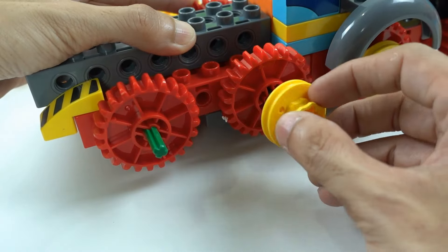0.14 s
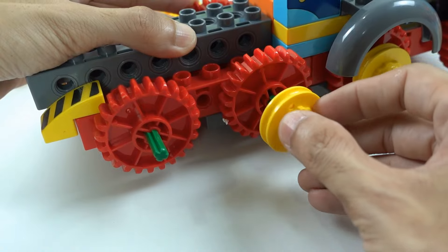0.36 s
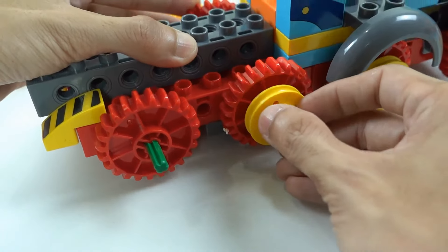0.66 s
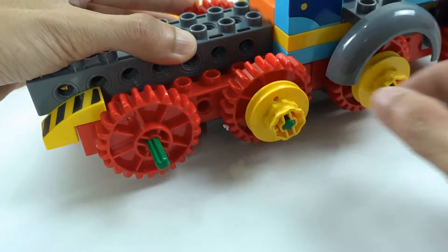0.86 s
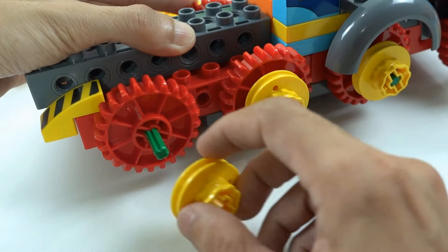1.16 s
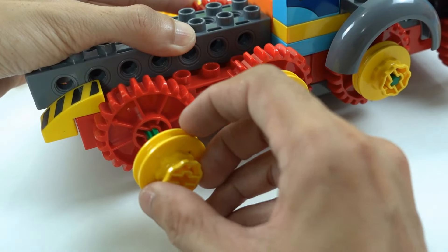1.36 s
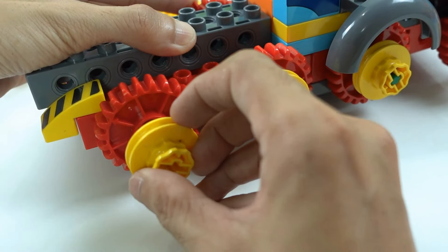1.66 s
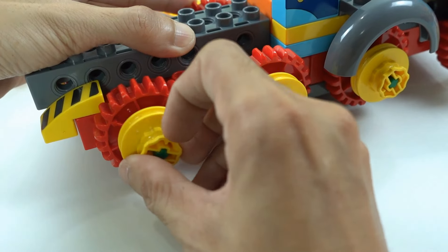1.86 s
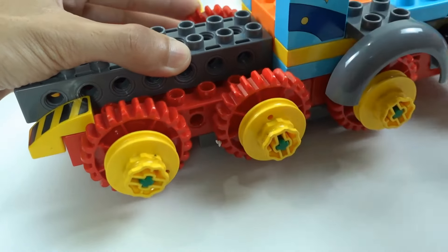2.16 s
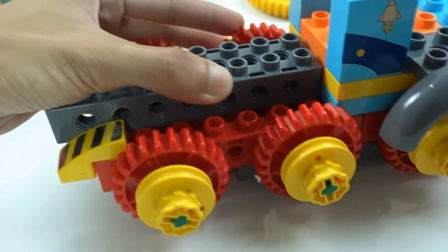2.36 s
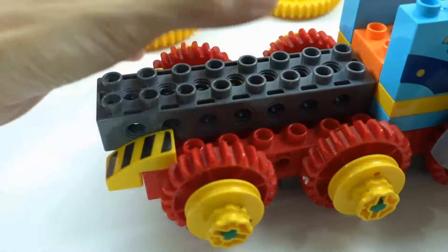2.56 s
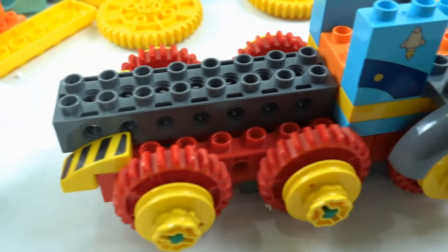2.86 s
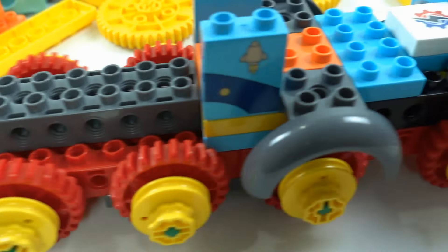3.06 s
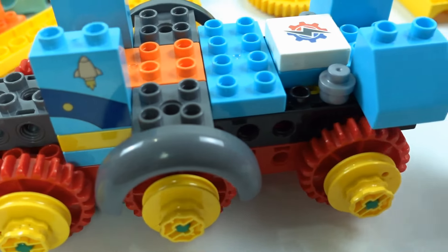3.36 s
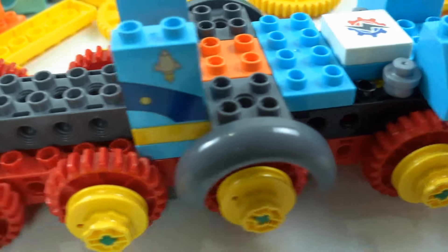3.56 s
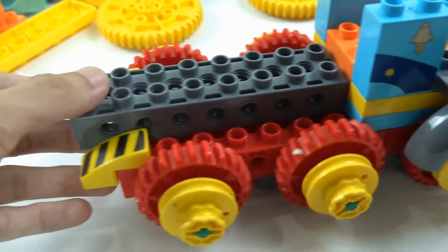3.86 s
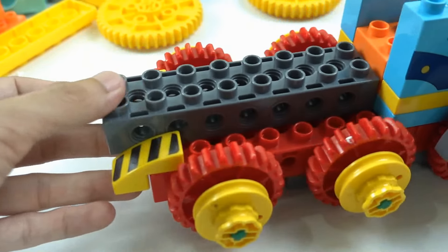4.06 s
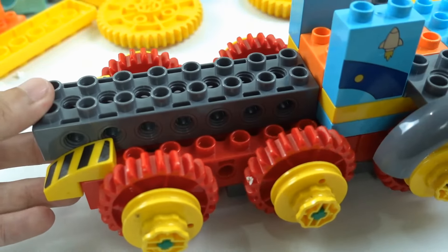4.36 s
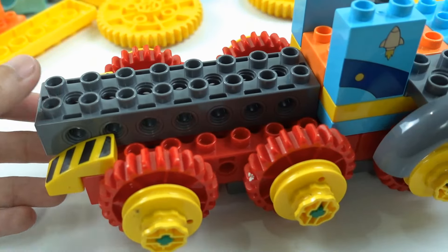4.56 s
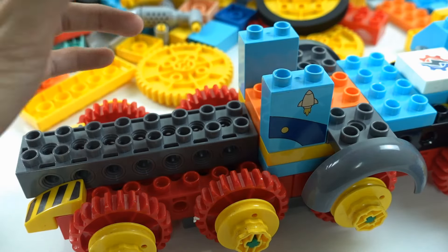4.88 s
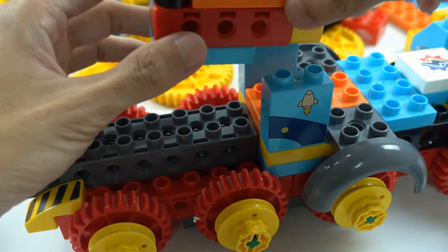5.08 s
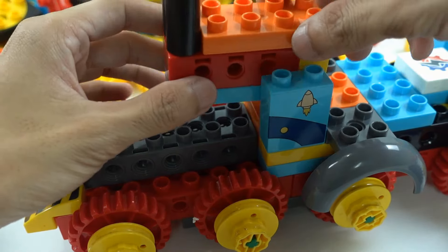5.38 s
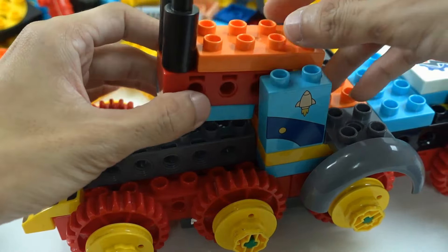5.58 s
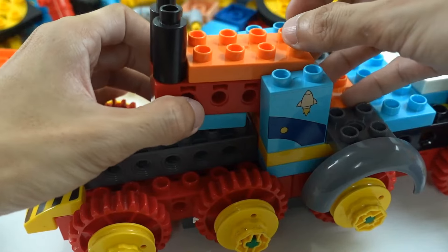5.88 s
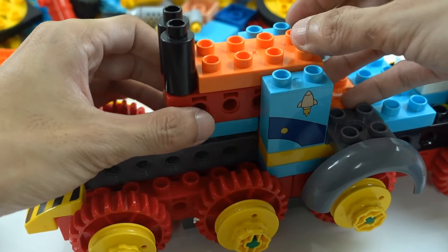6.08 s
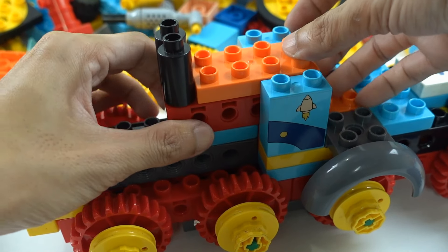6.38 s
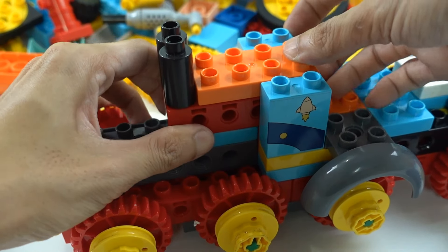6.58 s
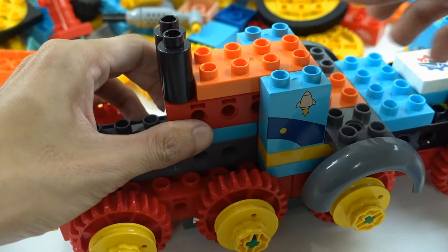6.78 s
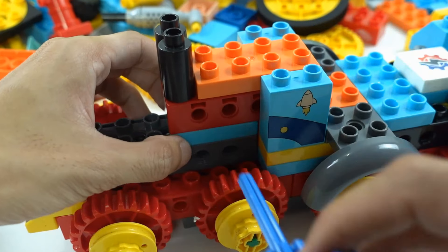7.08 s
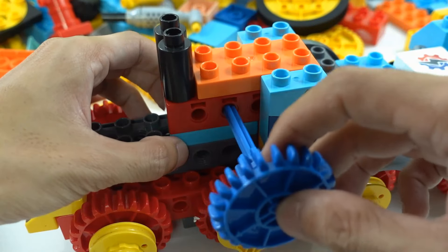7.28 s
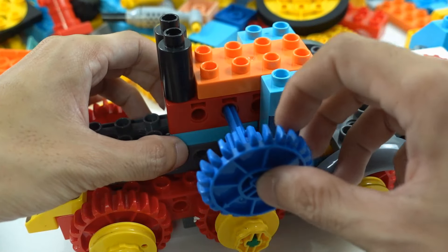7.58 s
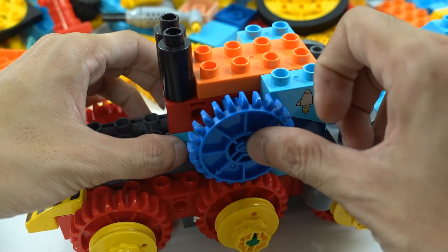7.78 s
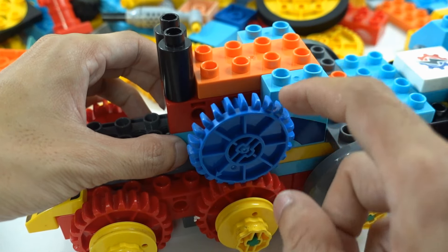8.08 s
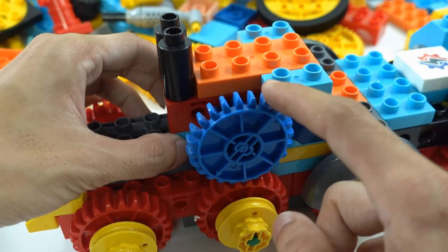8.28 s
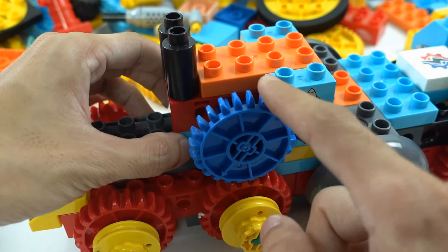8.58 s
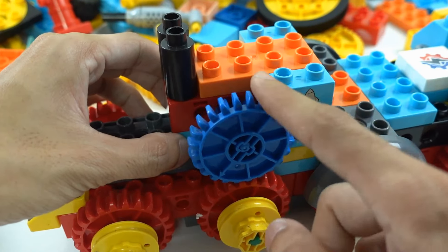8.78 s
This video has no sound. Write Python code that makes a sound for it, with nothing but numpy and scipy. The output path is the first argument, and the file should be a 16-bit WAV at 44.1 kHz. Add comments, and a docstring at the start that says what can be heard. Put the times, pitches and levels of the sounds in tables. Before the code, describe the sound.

Plastic hubs snap onto the axles of a toy vehicle built from large bricks, with light clicks and knocks. Its toothed wheels then clatter across a table, forward and back, with a few tiny squeaks. After a pause, hands press on a brick cab and a gear with clicks, hollow knocks, soft table thumps and faint finger rubbing. The sound is close, in a small bare room with a faint fan hum.

```python
"""Toothed wheels clatter on a table as a toy vehicle of large plastic bricks is rolled forward and back.
Each tooth is an impact that excites the modes of the hollow chassis. Before and after, hands build the
toy: hubs snap onto axles, a cab and a gear click and knock into place, and the table thumps.
Friction makes fingers rub and plastic squeak, and a loose brick chatters. A small, bare room adds
reverberation and standing waves; a fan hums faintly."""
import sys
import numpy as np
from scipy import signal
from scipy.fft import rfft, irfft
from scipy.io import wavfile
from scipy.ndimage import uniform_filter1d

SR = 44100
rng = np.random.default_rng(int(sys.argv[2]) if len(sys.argv) > 2 else 0)


def bounce(signal):
    """Save signal as a 16-bit WAV file at the path given by the first command-line argument."""
    frames = np.transpose(np.atleast_2d(signal))
    limited = np.clip(frames, -1, 1)
    pcm = np.round(limited * 32767).astype(np.int16)
    wavfile.write(sys.argv[1], SR, pcm)


N = 394254
TIME = np.arange(N) / SR
RING_TIME = TIME[:3072]  # time axis of one impact
TOP_HZ = 15900
CRACK_T60_S, KNOCK_RISE_S = 0.0087, 0.00089  # decay of a first crack, build-up of a body's knock
RING_DIRECT_DB, RING_RADIATED_DB = 1, -9  # weight of a part's rings towards the listener and the walls
FILTERS = {}


def undb(db):
    """Amplitude ratio of a level in decibels."""
    return 10 ** (np.asarray(db) / 20)


def unit(x):
    """Normalisation to rms 1."""
    return x / np.sqrt(np.mean(x ** 2))


def unit_blow(x):
    """Normalisation to rms 1 over the first 12 ms."""
    return x / np.sqrt(np.mean(x[..., :530] ** 2))


def along(points, hz):
    """Interpolation of (f, value) points on a logarithmic frequency axis."""
    f, v = np.transpose(points)
    return np.interp(np.log(np.maximum(hz, 1)), np.log(f), v)


def colour(x, points):
    """Zero-phase filtering by a spectrum of (f/Hz, level/dB) points."""
    n = x.shape[-1]
    return irfft(rfft(x) * undb(along(points, np.fft.rfftfreq(n, 1 / SR))), n)


def band(x, lo, hi, order=2):
    """Causal band-pass filtering between lo and hi (Hz)."""
    key = lo, hi, order
    if key not in FILTERS:
        FILTERS[key] = signal.butter(order, [lo, min(hi, .45 * SR)], "band", fs=SR, output="sos")
    return signal.sosfilt(FILTERS[key], x)


def fade(t, t60):
    """Exponential decay of 60 dB in t60 seconds."""
    return np.exp(-np.log(1000) * t / max(t60, 1e-3))


def pan(db):
    """Channel gains for a level difference, left minus right."""
    return undb(np.array([[db], [-db]]) / 2)


def add(out, s, x):
    """Superposition of x on out, starting at s seconds."""
    i = int(max(s, 0) * SR)
    out[:, i:i + x.shape[1]] += x[:, :max(N - i, 0)]


# Stereo width of the sound field: f/Hz, side minus mid level/dB
STEREO_WIDTH = [(100, -15), (300, -22), (600, -19), (1100, -12), (2200, -8), (4500, -2.5), (9000, -.5)]
def stereo_noise(size, width_db=0):
    """White noise whose coherence between left and right is high in the bass and low in the treble."""
    mid, side = rng.standard_normal((2, size))
    side = colour(side, [(f, db + width_db) for f, db in STEREO_WIDTH])
    equal_power = [(f, -10 * np.log10(1 + undb(db + width_db) ** 2)) for f, db in STEREO_WIDTH]
    return colour(np.array([mid + side, mid - side]), equal_power)


def mode(hz, t60, t):
    """A damped oscillation; high modes arrive further out of phase between left and right."""
    lag = np.arctan(undb(along(STEREO_WIDTH, hz))) * rng.choice([-1, 1])
    return np.sin(2 * np.pi * hz * t + np.array([[lag], [-lag]])) * fade(t, t60)


# Spectrum of the air noise: f/Hz, relative level/dB
AIR_SPECTRUM = [(40, -36), (80, -35), (115, -8.5), (150, -17.5), (210, -2.5), (290, -4), (370, -3.5),
                (470, -11), (1100, -8.5), (1700, -7), (1980, -16.5), (2420, -6), (2900, -13.5),
                (15500, -16)]
def air_and_fan(air_db=-60, fan_hz=358, fan_db=-76.5):
    """Broadband noise gives diffuse air; narrowband noise gives the wavering hum of a fan."""
    air = unit(colour(stereo_noise(N, width_db=4), AIR_SPECTRUM))
    hum = unit(band(rng.standard_normal(N), fan_hz - 2, fan_hz + 2))
    return undb(air_db) * air + undb(fan_db) * hum


# Modes of the hollow brick chassis: f/Hz, relative level/dB, T60/s
CHASSIS_MODES = [(477.5, -9.5, 0.08), (606, -9.5, 0.12), (728.8, -4, 0.12), (824, -4.5, 0.027),
                 (932, 0, 0.039), (1228, 0, 0.03), (1338, 2.5, 0.033), (1678, 1.5, 0.06),
                 (1872, 0.5, 0.049), (2130, -2.5, 0.064), (2447, 5, 0.04), (2836, 2.5, 0.033),
                 (3260, 5, 0.023), (5050, -7, 0.016)]
CHASSIS_RINGS = np.array([undb(db) * np.sin(2 * np.pi * hz * RING_TIME) * fade(RING_TIME, t60)
                          for hz, db, t60 in CHASSIS_MODES])
def chassis(detune=0.0043):
    """Modal superposition: each contact point weights the modes anew; the grip detunes them slightly."""
    ring = rng.standard_normal(len(CHASSIS_MODES)) @ CHASSIS_RINGS
    stretch = np.exp(detune * rng.standard_normal())
    return unit_blow(band(np.interp(RING_TIME * stretch, RING_TIME, ring), 370, 6300))


# Edges of the knock, clack, snap and tick bands: f/Hz
BAND_EDGES = [370, 1200, 3500, 8000, 16000]
# Spectrum of a struck brick shell: f/Hz, relative level/dB
SHELL_SPECTRUM = [(250, 3.5), (450, -13.5), (800, -2.5), (1100, -5), (1600, 3.5), (2900, -2), (3900, -5.5),
                  (5000, -6), (8300, -13), (10500, -19.5), (16000, -31.5)]
# Parts touching or seating: t/s, level/dB, knock offset/dB, hardness as treble slope/(dB per octave),
# main ring f/Hz, second ring f/Hz, tick offset/dB
CONTACTS = [(0.19, -43.5, 4, -3.5, 840, 1350, -2), (0.891, -53.5, -1, 0, 6160, 11900, 1),
            (1.116, -50.5, -19, -17, 1337, 3586, -6), (1.158, -50, -9, -16, 1840, 1370, -4),
            (1.518, -43, -1.5, -2.5, 2130, 1410, -2), (1.63, -45.5, 0, 1, 1480, 7140, -9),
            (2.046, -53.5, -3.5, 1, 3260, 14500, 1), (2.541, -24.5, -1.5, -4.5, 1366, 812, -9),
            (2.55, -24, -5.5, -6.5, 1328, 2400, -6), (2.622, -25.5, -6.5, -5.5, 1202, 2361, -7.5),
            (2.838, -52, -15, -4, 2120, 6500, -10), (4.66, -53, -2, 1.5, 1090, 15000, -6),
            (4.689, -50.5, -13, -3.5, 2375, 1390, 2), (5.313, -43.5, 2.5, -9, 1365, 660, -8),
            (5.367, -38.5, -8.5, -9, 1620, 2600, -12), (5.415, -35, -3, -8.5, 1594, 2430, -8),
            (5.514, -40, -4, -11, 1424, 1980, -9), (5.585, -40.5, -6, -12.5, 1430, 2050, -5),
            (5.774, -49.5, -18, -13, 2330, 1430, -12), (5.9199, -40, -13, -7.5, 2280, 1870, -4),
            (6.098, -35, -6, -3.5, 2110, 1679, -8), (6.124, -25.5, -15.5, -2, 1806, 3200, -9.5),
            (6.128, -28, -13, -4.5, 3150, 2120, -14), (6.2272, -45.5, -3, 4, 5030, 2002, -14),
            (6.363, -47, -18, -4.5, 2930, 1790, -2), (6.566, -43, -9, -4.5, 1376, 3030, -12),
            (6.845, -50, -3, 2.5, 9700, 14600, 1), (7.11, -51, -7.5, -3, 3260, 1620, 2),
            (7.386, -35.5, -2.5, -3.5, 1616, 853, -3), (7.403, -35, -4.5, -9.5, 918, 1593, -11),
            (7.6983, -39, -9.5, 0, 1640, 4230, -22), (7.715, -45, -10, 3, 3260, 5000, -13),
            (7.761, -40.5, -13, 3.5, 2560, 4650, -13), (7.774, -42.5, -16, 5, 3219, 4834, -17),
            (7.8074, -33, 2.5, 2.5, 4820, 837, -13), (7.8486, -26.5, -5, -2, 3520, 1490, -9),
            (7.8535, -25.5, 0.5, -4.5, 1430, 734, -2), (7.863, -29.5, -3, -10, 1438, 2620, -10),
            (7.8965, -24.5, -9.5, 0, 4090, 2100, -13.5), (8.018, -36, -14, -3.5, 4300, 2050, -24),
            (8.044, -47, -24, -4, 2060, 4100, -14), (8.287, -46, -4, -12, 1363, 2230, -20),
            (8.441, -35, -9.5, -4.5, 1680, 4070, -21), (8.448, -41.5, -2, -9, 877, 2270, -14),
            (8.498, -35.5, -10, -5, 2370, 1670, -21), (8.505, -42, -2, -9, 728, 1670, -20),
            (8.637, -39, -4.5, -8, 1636, 850, -1), (8.6837, -32.5, -18, -9.5, 1807, 3380, -22),
            (8.691, -45.5, 2.5, -6, 765, 2410, -11), (8.8296, -35.5, -8, -4.5, 2250, 1790, -6),
            (8.8643, -31, -11, -1, 4550, 2390, -17), (8.871, -43.5, 1, -3, 739, 1650, -14)]
def clicks(chassis_db=-8, crack_db=-2, second_ring_db=-2.5, ring_corner_hz=1106):
    """Impacts excite shell and chassis modes; hard, light ones are bright and short. (direct, radiated)"""
    direct, radiated = np.zeros((2, 2, N))
    centres = np.sqrt(np.multiply(BAND_EDGES[:-1], BAND_EDGES[1:]))
    octaves = np.maximum(np.log2(centres / centres[1]), 0)
    crack = undb(crack_db) * unit_blow(fade(RING_TIME, CRACK_T60_S))
    for s, level_db, knock_db, hardness, ring_hz, second_hz, tick_db in CONTACTS:
        levels = level_db + hardness * octaves + np.array([knock_db, 0, 0, tick_db])
        t60 = 0.085 * 2 ** (knock_db / 15 - hardness / 14)  # heavy, soft contacts ring longer
        touch_s = 0.0003 * 2 ** (-hardness / 6.5)  # soft contacts build up more slowly
        rises = [1 - np.exp(-RING_TIME / rise_s) for rise_s in (KNOCK_RISE_S, touch_s, touch_s, touch_s)]
        shell = unit(colour(stereo_noise(len(RING_TIME)), SHELL_SPECTRUM))
        body = undb(chassis_db) * chassis()
        for lo, hi, db, rise in zip(BAND_EDGES, BAND_EDGES[1:], levels, rises):
            band_t60 = t60 * (1000 / max(lo, 1000)) ** 0.11  # plastic damps its high modes sooner
            decay = unit_blow(unit_blow(fade(RING_TIME, band_t60)) + crack)
            dense_modes = unit_blow(band(rise * (shell * decay + body), lo, hi, order=3))
            rings = 0
            for hz, share_db in ((ring_hz, 0), (second_hz, second_ring_db)):
                if lo <= hz < hi:
                    ring = mode(hz, t60 * min(1, ring_corner_hz / hz), RING_TIME)
                    rings += undb(share_db) * unit_blow(rise * ring)
            add(direct, s, undb(db) * unit_blow(dense_modes + undb(RING_DIRECT_DB) * rings))
            add(radiated, s, undb(db) * unit_blow(dense_modes + undb(RING_RADIATED_DB) * rings))
    return direct * pan(-0.8), radiated * pan(-0.8)


# Spans in which fingers shift their grip: start t/s, end t/s, base level/dB
GRIP_SPANS = [(0.399, 0.753, -66.5), (1.544, 2.495, -59.5), (5.403, 6.798, -55.5), (8.299, 8.939, -55)]
def fingertips(scatter_db=6, bumps_per_span=14):
    """Soft impacts carry little treble: fingertips bump the parts faintly at random moments."""
    out = np.zeros((2, N))
    for start, end, db in GRIP_SPANS:
        for when, size in rng.uniform(0, 1, (bumps_per_span, 2)):
            bump = band(tooth(edge_db=0), 180, 1200)
            add(out, start + when * (end - start), undb(db + scatter_db * size) * bump)
    return out


# Plastic slipping on plastic: centre t/s, f/Hz, peak level/dB, duration/s
SLIPS = [(0.765, 4550, -69, 0.12), (1.874, 4700, -67, 0.1), (2.928, 2200, -33, .014),
         (2.989, 2580, -22, .018), (3.983, 2800, -26, .014), (4.062, 2780, -28, .016),
         (5.88, 1466, -52, .075)]
def squeaks(waver=0.032):
    """Stick-slip friction gives brief tones of unsteady pitch."""
    out = np.zeros((2, N))
    for s, hz, db, length in SLIPS:
        n = int(length * SR)
        pitch = hz * (1 + waver * unit(uniform_filter1d(rng.standard_normal(n), size=100)))
        squeak = unit(np.sin(2 * np.pi * np.cumsum(pitch) / SR)) * np.hanning(n)
        add(out, s - length / 2, undb(db) * squeak * np.ones((2, 1)))
    return out


# Modes of a wheel hub: f/Hz, relative level/dB, T60/s
HUB_MODES = [(2440, -12, 0.038), (3260, -6, .014), (4680, -2.5, 0.0099), (5080, -5, 0.012),
             (5480, -5.5, 0.0096), (7120, -3, 0.0091), (8200, -5, 0.011)]
# A hub snaps home on its axle: t/s, level/dB, most strongly driven f/Hz
HUB_SNAPS = [(0.7902, -27, 5330), (1.918, -28, 3230), (1.9228, -36.5, 3250)]
def hub_snaps(focus_db=7, focus_octaves=0.078, crack_db=-7, knock_db=-16):
    """Snap-through: a hub jumps over its axle end, cracks, rings, jolts the chassis. (direct, radiated)"""
    direct, radiated = np.zeros((2, 2, N))
    knock_lo, knock_hi = BAND_EDGES[:2]
    for s, level_db, focus_hz in HUB_SNAPS:
        ring = 0
        for hz, db, t60 in HUB_MODES:
            boost_db = focus_db * np.exp(-(np.log2(hz / focus_hz) / focus_octaves) ** 2)
            ring += undb(db + boost_db) * mode(hz, t60, RING_TIME)
        ring = unit_blow(band(ring, knock_hi, TOP_HZ, order=3))
        burst = stereo_noise(len(RING_TIME)) * fade(RING_TIME, CRACK_T60_S)
        crack = undb(crack_db) * unit_blow(band(burst, knock_hi, 6700))
        knock = undb(knock_db) * unit_blow(band(chassis(), knock_lo, knock_hi, order=3))
        add(direct, s, undb(level_db) * (unit_blow(crack + ring) + knock))
        add(radiated, s, undb(level_db) * (unit_blow(crack + undb(RING_RADIATED_DB) * ring) + knock))
    return direct, radiated


# The push of a hand gives way into the table: t/s, relative level/dB, f/Hz
TABLE_THUMPS = [(0.791, -44.5, 213), (1.924, -43.5, 216), (2.547, -49, 197), (2.624, -39.5, 199),
                (3.358, -28.5, 206), (5.416, -44, 188), (6.123, -39.5, 205), (6.364, -42.5, 216),
                (7.856, -40.5, 196)]
def table_thumps(gain_db=-2, spread=1.374):
    """Impulse response of the table: as a part seats, the hand's force drives a low, damped resonance."""
    out = np.zeros((2, N))
    impulse = (RING_TIME == 0) * np.ones((2, 1))
    for s, db, hz in TABLE_THUMPS:
        add(out, s, undb(gain_db + db) * unit_blow(band(impulse, hz / spread, hz * spread)))
    return out


# Skin and parts sliding over plastic: centre t/s, duration/s, peak level/dB, centre f/Hz
SLIDES = [(1.124, 0.17, -53.5, 1440), (1.127, 0.21, -55.5, 5200), (2.41, 0.3, -55.5, 1140),
          (5.6, 0.44, -59, 2800), (7.69, 0.13, -49.5, 3000), (6.2, 0.46, -55, 620),
          (5.886, 0.6, -63.5, 3300), (6.876, 0.21, -55, 470), (7.78, 0.17, -47.5, 2500)]
def rubs(grain_db=3, spread=2.8):
    """Sliding friction gives grainy, band-limited noise that swells and dies."""
    out = np.zeros((2, N))
    for s, length, db, hz in SLIDES:
        n = int(length * SR)
        grip = undb(grain_db * unit(uniform_filter1d(rng.standard_normal(n), size=150)))
        rub = unit(band(stereo_noise(n) * grip, hz / spread, hz * spread))
        add(out, s - length / 2, undb(db) * rub * np.hanning(n))
    return out


# Spectrum of a gear tooth striking the table: f/Hz, relative level/dB
TOOTH_SPECTRUM = [(90, -32.5), (200, -19.5), (380, -9), (600, 0), (1100, 3.5), (1800, -2.5), (2600, 4.5),
                  (4000, -2), (6000, -16.5), (8000, -20), (10300, -32), (12300, -38), (15000, -48.5)]
def tooth(edge_db, t60=0.05, contact_s=0.00036, chassis_db=-10.5, crack_db=-9):
    """One tooth's impact excites a broad spectrum: a dull knock, a bright edge and the chassis modes."""
    grain = unit(colour(stereo_noise(len(RING_TIME)), TOOTH_SPECTRUM))
    rise = 1 - np.exp(-RING_TIME / contact_s)
    crack = undb(crack_db) * unit_blow(fade(RING_TIME, CRACK_T60_S))
    impact = grain * rise * (unit_blow(fade(RING_TIME, t60)) + crack)
    knock = band(impact, 175, 1760)
    edge = undb(edge_db) * band(impact, 6100, TOP_HZ)
    return unit_blow(unit_blow(knock + edge) + undb(chassis_db) * chassis())


# The hand pushes or rocks the vehicle: start t/s, end t/s, top speed/full speed
HAND_PUSHES = [(2.53, 2.651, 0.55), (2.91, 3.385, .96), (3.385, 3.49, .12), (3.59, 4.085, 1),
               (4.092, 4.278, .16), (4.292, 4.408, .28)]
def speed(speed_up=.3, slow_down=.15):
    """Uniform acceleration opens each push; the speed holds, then falls more quickly to rest."""
    return sum(np.interp(TIME, [a, a + speed_up * (b - a), b - slow_down * (b - a), b], [0, top, top, 0])
               for a, b, top in HAND_PUSHES)


# A tooth of the wheel that bears the weight drops hard on the table: t/s, level/dB
TOOTH_STRIKES = [(2.907, -40), (2.919, -36), (2.948, -31.5), (2.968, -32), (2.977, -29.5), (3.004, -26),
                 (3.019, -23), (3.034, -31), (3.048, -21), (3.072, -22.5), (3.097, -26.5), (3.118, -21),
                 (3.132, -25.5), (3.148, -20.5), (3.157, -22.5), (3.171, -18.5), (3.192, -18),
                 (3.213, -22.5), (3.233, -18), (3.252, -17), (3.272, -19.5), (3.296, -22), (3.325, -21),
                 (3.357, -21), (3.399, -28.5), (3.459, -35.5), (3.563, -35), (3.596, -31), (3.636, -22),
                 (3.667, -21.5), (3.69, -20), (3.711, -19.5), (3.738, -18.5), (3.769, -18.5), (3.8, -20),
                 (3.828, -20), (3.843, -15.5), (3.867, -19.5), (3.885, -20), (3.909, -22), (3.93, -20),
                 (3.949, -21), (3.976, -23), (4.002, -25), (4.025, -22.5), (4.033, -17.5), (4.143, -37),
                 (4.205, -35.5), (4.225, -27), (4.244, -30.5), (4.262, -27), (4.3021, -24.5),
                 (4.316, -27.5), (4.343, -28.5), (4.351, -33.5), (4.406, -39.5)]
def rolling(teeth_per_s=52, rattle_db=-27.5, slow_edge_db=-8, fast_edge_db=1, wheels=5):
    """Impact trains: the loaded wheel strikes and bounces; speed quickens and brightens the rattle."""
    pace = speed()
    edge_db = slow_edge_db + (fast_edge_db - slow_edge_db) * pace
    out = np.zeros((2, N))
    harder_db, bounce_s, bounce_db = 1.5, .006, -9.5
    for s, db in TOOTH_STRIKES:
        add(out, s, undb(db) * tooth(edge_db[int(s * SR)] + harder_db))
        add(out, s + bounce_s * rng.uniform(0.545, 2), undb(db + bounce_db) * tooth(slow_edge_db))
    # The other wheels rattle in their play even when slow, so the rate falls less than the speed.
    teeth_passed = np.cumsum(pace ** .45) * teeth_per_s / SR
    jitter_teeth, scatter_db = .3, 1.5
    for wheel in range(wheels):
        offsets, sizes = rng.standard_normal((120, 2)).T
        landings = np.arange(len(offsets)) + 1 - wheel / wheels + jitter_teeth * offsets
        for i, size in zip(np.searchsorted(teeth_passed, landings), sizes):
            if 0 < i < N:
                force = pace[i] ** 0.91 * undb(rattle_db + scatter_db * size)
                add(out, i / SR, force * tooth(edge_db[i]))
    return out * pan(-1.16)


# A loose brick taps its neighbour: t/s, level/dB
BRICK_TAPS = [(5.472, -54), (5.491, -51), (5.54, -52), (5.599, -48), (5.837, -51), (5.868, -51),
              (5.972, -52), (6.041, -51.5), (6.498, -53.5), (7.787, -43), (8.709, -56), (8.882, -50)]
def chatter(base_hz=2000, spread=1.18, t60=0.037):
    """Intermittent contact: studs skid and catch on a brick's rim, each soft clack at its own pitch."""
    out = np.zeros((2, N))
    envelope = fade(RING_TIME, t60) * (1 - np.exp(-RING_TIME / KNOCK_RISE_S))
    for s, db in BRICK_TAPS:
        hz = base_hz * spread ** rng.uniform(-0.55, 0.28)
        clack = band(stereo_noise(len(RING_TIME)) * envelope, hz / spread, hz * spread)
        add(out, s, undb(db) * unit_blow(clack))
    return out


# Reverberation time of the room: f/Hz, T60/s
ROOM_DECAY = [(200, 0.83), (700, 0.48), (1800, 0.53), (4000, 0.49), (13000, 0.2)]
# Spectrum of the reverberant tail: f/Hz, relative level/dB
TAIL_SPECTRUM = [(150, -3.5), (500, -0.5), (1500, -3), (2800, -3), (4000, -5), (9000, 1.5), (16000, 4.5)]
def wall_response(wet_db=-6.0, build_s=0.0006):
    """Diffuse reflection from bare walls gives a tail whose treble is absorbed first."""
    t = TIME[:SR]
    noise, hz = rfft(stereo_noise(SR)), np.fft.rfftfreq(SR, 1 / SR)
    tail = 0
    for centre, t60 in ROOM_DECAY:
        band_weight = along([(f, f == centre) for f, _ in ROOM_DECAY], hz)
        tail += irfft(noise * band_weight) * fade(t, t60)
    tail = colour(tail, TAIL_SPECTRUM) * (1 - np.exp(-(t / build_s) ** 2))
    midrange_gain = np.sqrt(np.mean(np.abs(rfft(tail)[:, 500:2000]) ** 2))
    return undb(wet_db) * tail / midrange_gain


def reverberation(x, patterns=5, shifts_per_s=7):
    """Time-varying paths: as hands and toy move, one pattern of echoes crossfades into the next."""
    out = 0
    for k in range(patterns):
        away = np.abs((TIME * shifts_per_s - k) % patterns - patterns / 2)
        share = np.cos(np.pi / 2 * np.minimum(away, 1))
        out += signal.fftconvolve(x * share, wall_response(), axes=1)[:, :N]
    return out


# Low modes of the room: f/Hz, relative level/dB, T60/s
ROOM_MODES = [(118, -10.5, 0.85), (211, -4, 0.88), (240.7, -8.5, 1), (283, -5, 0.45)]
def standing_waves(x, gain_db=-21):
    """Room resonance: low standing waves hum on after a thump."""
    waves = unit(sum(undb(db) * mode(hz, t60, TIME[:SR]) for hz, db, t60 in ROOM_MODES)) / np.sqrt(SR)
    return undb(gain_db) * signal.fftconvolve(x, waves, axes=1)[:, :N]


def scene():
    """Direct and reverberant fields add; the table top couples best to the standing waves."""
    air, table = air_and_fan(), table_thumps()
    # Directivity: a part beams a few modes at the listener, while the walls receive all of them evenly.
    beamed, spread = np.add(clicks(), hub_snaps())
    handling = chatter() + fingertips() + rubs() + squeaks() + rolling()
    direct = handling + beamed + undb(-14) * table
    radiated = handling + undb(-0.13) * spread
    echoes = reverberation(radiated + undb(-5) * table)
    boom = standing_waves(table + undb(-5) * radiated)
    return direct + echoes + boom + air


def record(dry):
    """Band limiting: a steep low-pass filter removes the highest treble."""
    return signal.sosfilt(signal.ellip(10, .2, 80, TOP_HZ, fs=SR, output="sos"), dry)


dry = scene()
out = record(dry)
bounce(out)
```